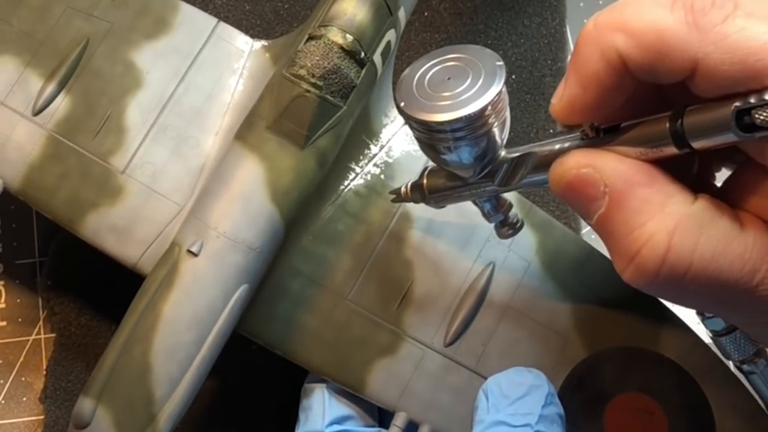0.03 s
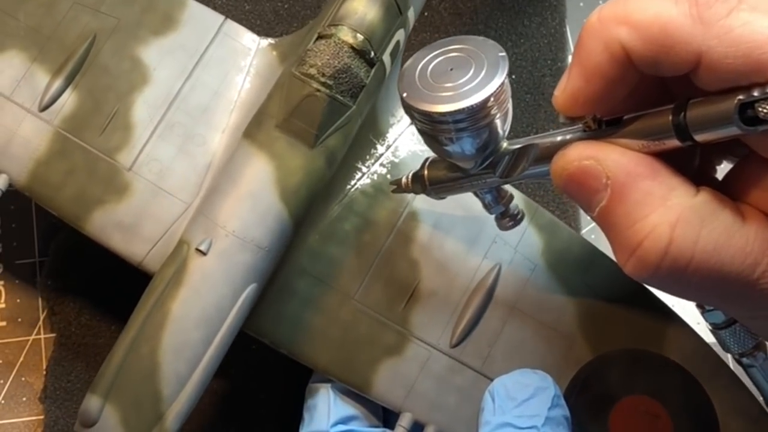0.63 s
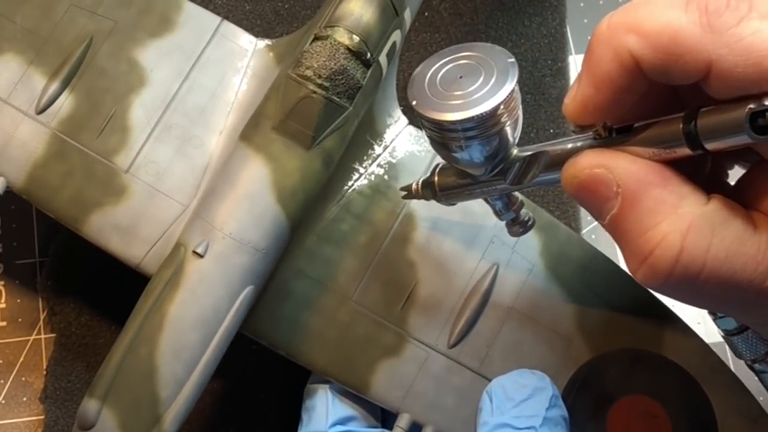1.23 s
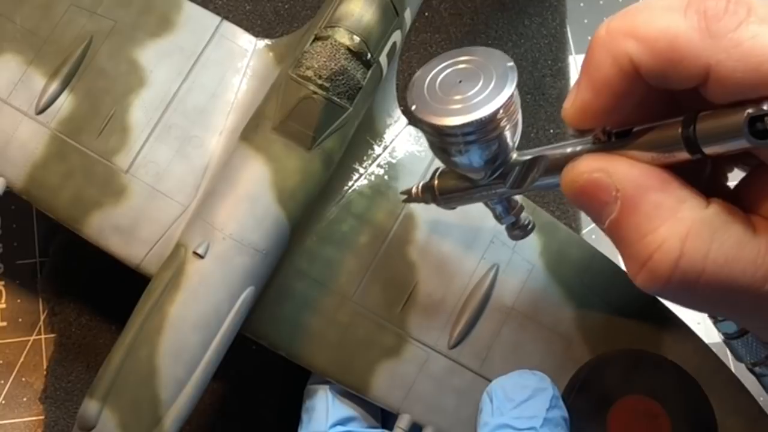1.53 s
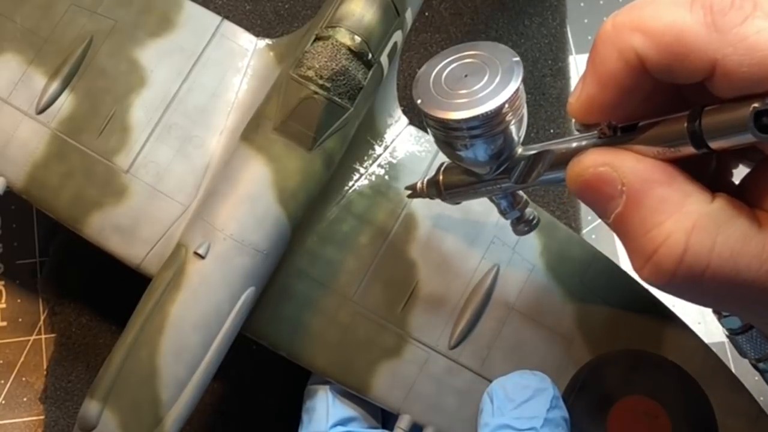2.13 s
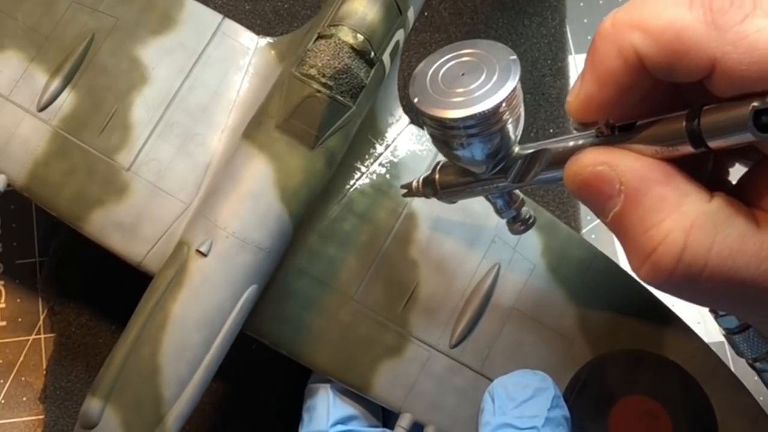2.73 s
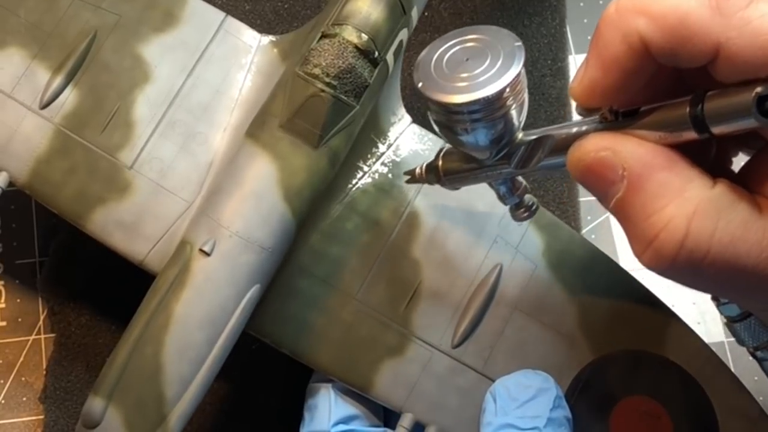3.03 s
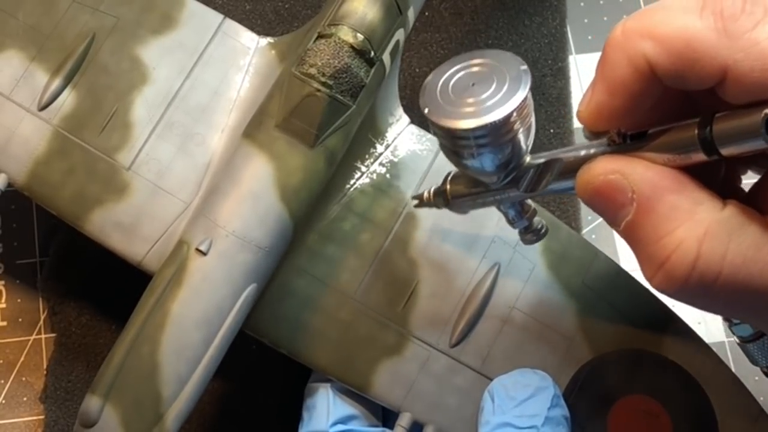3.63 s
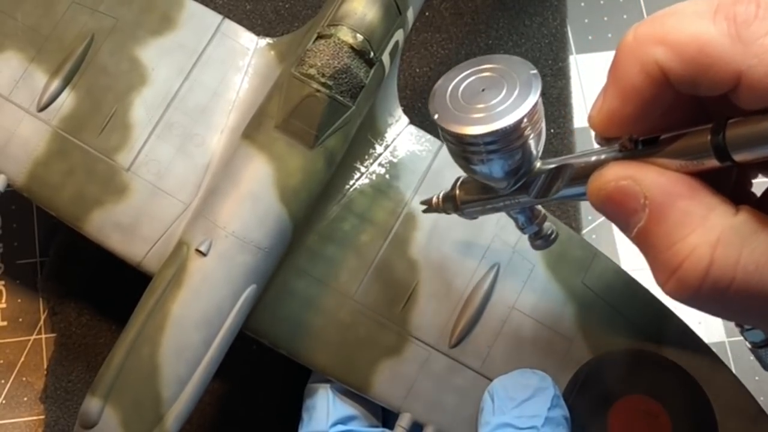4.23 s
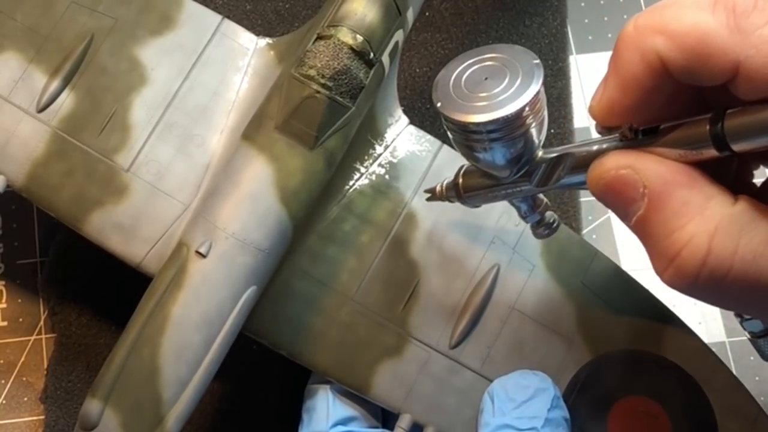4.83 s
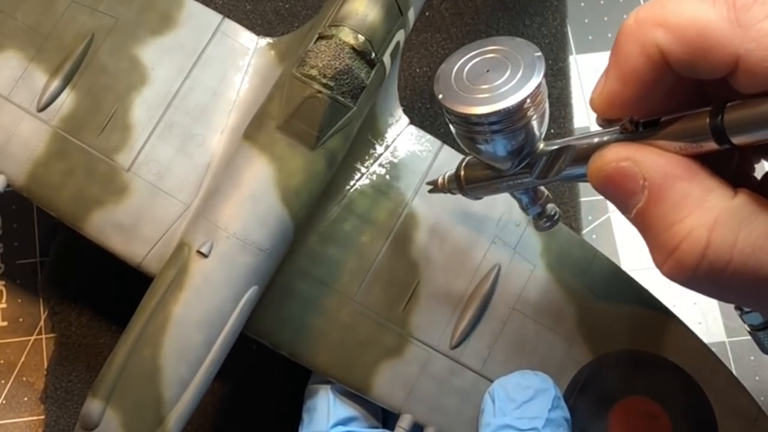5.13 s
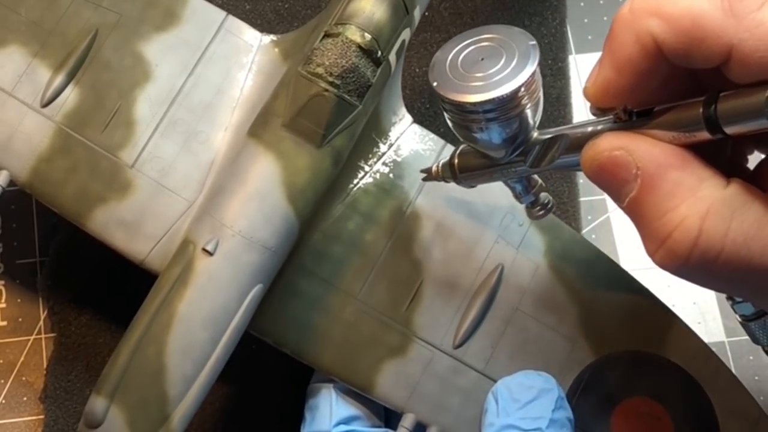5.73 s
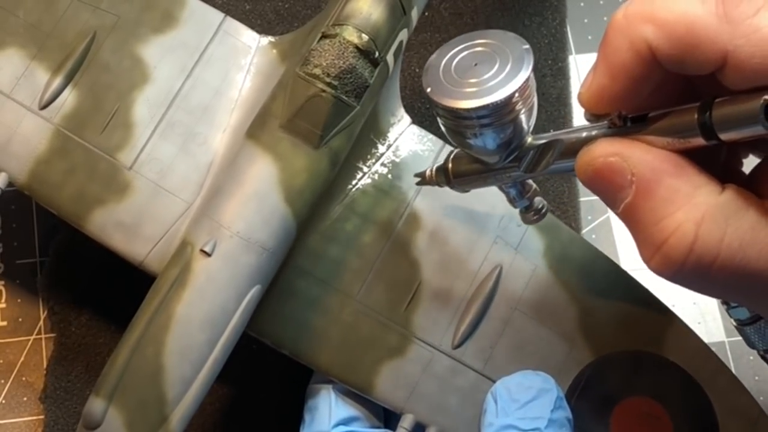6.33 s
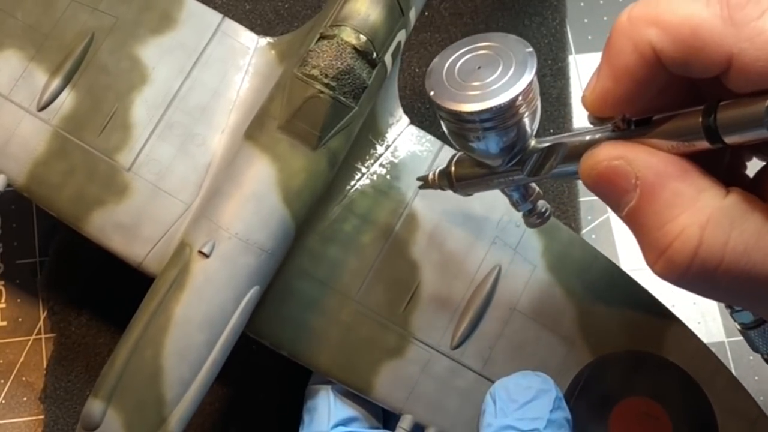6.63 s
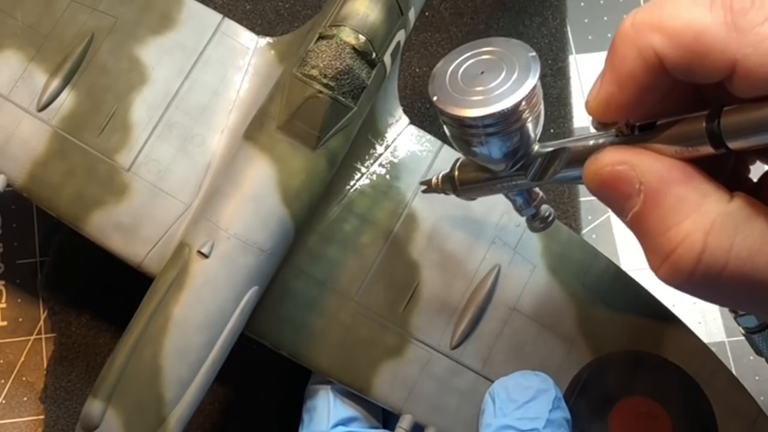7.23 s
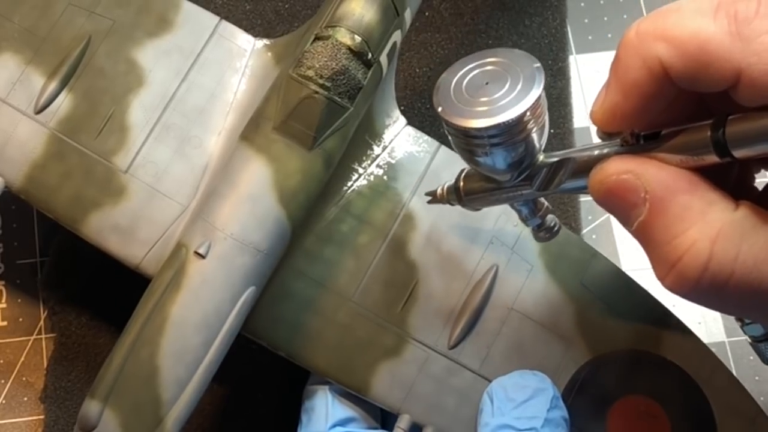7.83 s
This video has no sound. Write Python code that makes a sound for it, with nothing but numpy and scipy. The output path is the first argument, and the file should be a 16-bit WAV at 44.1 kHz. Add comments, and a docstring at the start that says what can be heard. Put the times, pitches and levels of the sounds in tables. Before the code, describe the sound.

An airbrush sprays with a bright, steady hiss while a small compressor whines and rattles behind it.

```python
"""A bright, steady hiss, close and in mono: an airbrush blowing over the wing of a plastic model.
Its turbulent air shifts in colour as the nozzle moves and now and then brushes a hollow at the wing root.
Behind it runs a small piston compressor: the induction motor whines and throbs, the valves rattle
the housing on every turn, and a soft rumble comes through the bench."""
import sys
import numpy as np
from scipy import signal
from scipy.fft import rfft, irfft
from scipy.io import wavfile
from scipy.ndimage import uniform_filter1d

SR = 44100
rng = np.random.default_rng(int(sys.argv[2]) if len(sys.argv) > 2 else 0)


def inscribe(sig):
    """Save sig as 16-bit PCM at rate SR to the path in sys.argv[1].

    A 1-D sig is mono; a 2-D sig holds one channel per row.
    Samples are clipped to [-1, 1] before scaling.
    """
    pcm = np.round(np.clip(np.atleast_2d(sig).T, -1, 1) * 32767)
    wavfile.write(sys.argv[1], SR, pcm.astype(np.int16))


N = 356195


def gain_of(db):
    """Decibels to amplitude."""
    return 10 ** (np.asarray(db) / 20)


def unit_rms(x):
    """Scales to rms 1."""
    return x / np.sqrt(np.mean(x ** 2) + 1e-20)


def curve_at(points, hz):
    """Joins spectrum points by straight lines on a log-frequency axis."""
    point_hz, value = np.transpose(points)
    return np.interp(np.log(hz + 1), np.log(point_hz + 1), value)


def noise(colour):
    """Noise of rms 1 whose amplitude spectrum is colour(Hz)."""
    white = rfft(rng.standard_normal(N))
    return unit_rms(irfft(white * colour(np.fft.rfftfreq(N, 1 / SR)), N))


def drift(rate_hz):
    """A random wander of rms 1, mostly slower than rate_hz."""
    return noise(lambda hz: 1 / (1 + (hz / rate_hz) ** 2))


def patches(shape, size):
    """A random field of rms 1, smoothed over size = (bins, frames)."""
    field = rng.standard_normal(shape)
    for axis in (0, 1, 0, 1):
        field = uniform_filter1d(field, size[axis], axis, mode="wrap")
    return unit_rms(field)


# The boom of bench and room. Each row: centre in Hz, width in Hz, relative level in dB.
BENCH_MODES = [(43.7, 7, 0), (53, 6.8, 3.5), (94, 12, -5), (120.3, 17, -3.5), (148.4, 14, -4.5),
               (175, 23, -10.5), (203, 16, -3.5)]
# Steady low drones beside the motor. Each row: pitch in Hz, level in dB.
DRONE_TONES = [(53, -61.5), (137.3, -66.5)]
# The airy bed of room and motor. Each row: frequency in Hz, relative level in dB.
ROOM_COLOUR = [(20, -22), (40, -4), (70, 0), (230, 0), (300, -4), (380, -1), (550, -5), (750, 0),
               (1000, -4), (1500, -2), (1900, -5), (2400, -13), (5000, -30)]


def rumble(bench_db=-57.5, room_db=-56.5):
    """The compressor shakes low resonances of bench and room, under two drones and a bed of air."""
    t = np.arange(N) / SR
    bench = noise(lambda hz: sum(gain_of(db) / (1 + (2 * (hz - centre) / width) ** 2)
                                 for centre, width, db in BENCH_MODES))
    drones = sum(gain_of(db) * np.sqrt(2) * np.sin(2 * np.pi * hz * t) for hz, db in DRONE_TONES)
    room = noise(lambda hz: gain_of(curve_at(ROOM_COLOUR, hz)))
    return gain_of(bench_db) * bench + drones + gain_of(room_db) * room


SHAFT_HZ, MAINS_HZ = 29.1466, 60.0083
# Resonances of the motor housing. Each row: centre in Hz, width in Hz.
HOUSING_MODES = [(756, 82), (789, 21)]
# The whine, each tone at a sum of the two rates. Each row: shaft multiple, mains multiple, level in dB.
MOTOR_TONES = [(2, 0, -71), (3, 0, -61.0), (4, 0, -66), (0, 2, -67), (5, 0, -67.5), (6, 0, -66),
               (8, 0, -81), (10, 0, -66), (11, 0, -73), (12, 0, -62), (14, 0, -72.5), (15, 0, -74.5),
               (16, 0, -80.5), (17, 0, -72), (18, 0, -88), (19, 0, -76), (20, 0, -69), (1, 10, -62.5),
               (22, 0, -74), (2, 10, -58), (-2, 12, -69.5), (23, 0, -74), (-1, 12, -62.5), (24, 0, -77),
               (0, 12, -37.5), (29, -2, -54), (25, 0, -51), (1, 12, -61), (30, -2, -64), (26, 0, -47.5),
               (2, 12, -53), (-2, 14, -85), (27, 0, -50.5), (3, 12, -85), (-1, 14, -69.5), (28, 0, -57),
               (0, 14, -77), (29, 0, -61), (1, 14, -54), (30, 0, -58), (32, 0, -67.5), (36, 4, -63.5),
               (37, 4, -71.5)]


def motor(turns, waver=0.014):
    """Magnetic and shaft tones; the rotor slips behind the mains, so close pairs beat in a steady throb."""
    shaft_cycles = turns - .247
    mains_cycles = MAINS_HZ * np.arange(N) / SR - .311
    whine = np.zeros(N)
    for shaft_order, mains_order, db in MOTOR_TONES:
        hz = shaft_order * SHAFT_HZ + mains_order * MAINS_HZ
        cycles = shaft_order * shaft_cycles + mains_order * mains_cycles
        # tones above a housing resonance lag those below it
        lag = sum(2 * np.arctan(2 * (hz - centre) / width) for centre, width in HOUSING_MODES)
        whine += gain_of(db) * np.sqrt(2) * np.cos(2 * np.pi * cycles - lag)
    return whine * (1 + waver * drift(rate_hz=4.9))


# The rattle of piston and valves.
# Each row: moment as a share of the turn, pitch in Hz, seconds to die by 60 dB, level in dB.
VALVE_KNOCKS = [(0.403, 1112, 0.087, -52.0), (0.434, 1436, 0.057, -42.9), (0.452, 1483, 0.1, -50.0),
                (0.6, 1255, 0.1, -60.5), (0.619, 1530, 0.02, -42.8), (0.62, 1750, 0.014, -43.6),
                (0.626, 1108, 0.018, -42.1), (0.63, 1423, 0.086, -50.5), (0.634, 2010, 0.098, -66.3),
                (0.784, 1978, 0.1, -53.8), (0.843, 1025, 0.057, -51.3)]


def valves(turns, uneven_db=1.14):
    """Each turn strikes the pump's modes in the same order, never quite equally hard."""
    t = np.arange(SR // 8) / SR
    strength = gain_of(uneven_db * drift(SHAFT_HZ))
    rattle = np.zeros(N)
    for moment, hz, t60, db in VALVE_KNOCKS:
        samples_from_strike = ((turns - moment + .5) % 1 - .5) * SR / SHAFT_HZ
        strikes = np.maximum(1 - abs(samples_from_strike), 0) * strength
        ring = np.exp(-np.log(1000) * t / t60) * np.sin(2 * np.pi * hz * t)
        rattle += gain_of(db) * signal.oaconvolve(strikes, ring)[:N]
    return rattle


# Breathy passes over the hollow at the wing root.
# Each row: middle in seconds, length in seconds, top pitch in Hz, top level in dB.
HOLLOW_PASSES = [(2.63, .6, 2350, -61.5), (4.35, .7, 2710, -64), (7.6, 0.42, 2220, -66)]


def hollow(width_hz=220, pitch_sag=.1):
    """The jet wakes a broad, soft resonance: on each pass its level and pitch rise and fall in one arch."""
    t = np.arange(N) / SR
    air = drift(width_hz) + 1j * drift(width_hz)
    breath = np.zeros(N)
    for middle, length, hz, db in HOLLOW_PASSES:
        arch = np.cos(np.pi * np.clip((t - middle) / length, -.5, .5))
        pitch_hz = hz * (1 - pitch_sag * (1 - arch))
        phase = 2 * np.pi * np.cumsum(pitch_hz) / SR
        breath += gain_of(db) * arch ** 2 * (air * np.exp(1j * phase)).real
    return breath


# The tone colour of the hiss. Each row: frequency in Hz, relative level in dB.
JET_COLOUR = [(600, -11), (2200, -14.5), (2900, -14.5), (3600, -12), (4300, -13), (4700, -7.5),
              (5200, -12.5), (6000, -11.5), (7900, -4), (9900, -6), (11000, -6), (12000, -8.5), (14500, 3),
              (16000, -2)]
# Level rides for the top, middle and low treble: sizzle at the nozzle, rush on the wing, wash off it.
# Each row: time in seconds, boost or cut in dB.
SIZZLE_RIDE = [(0.0, -0.5), (0.85, 0.5), (1.7, -0.3), (3.15, 1.4), (3.95, -1.1), (5.3, -0.2), (5.9, 1),
               (7.4, 0.5), (8.0, -0.5)]
RUSH_RIDE = [(0.0, 1), (0.7, 1.1), (2.55, -0.3), (2.95, 0.5), (4.25, -1.1), (5.9, 1.5), (6.15, -0.6),
             (8.0, -1.2)]
WASH_RIDE = [(0.0, -0.8), (2.2, 0.7), (3.95, 1.0), (5.6, -2), (6.6, 0.2), (8.0, 0.4)]
# The centres of sizzle, rush and wash in Hz, in that order.
BAND_CENTRES = [13500, 7350, 3200]


def jet(level_db=-38.5, shift_db=.5, ripple_db=1.5, lift_s=8.02, lift_db_per_s=75):
    """Turbulent air changes colour as the nozzle moves, and dips at the very end as the hand lifts away."""
    framing = dict(fs=SR, nperseg=1024, noverlap=768)
    hz, t, white = signal.stft(rng.standard_normal(N), **framing)
    lift_db = lift_db_per_s * np.maximum(t - lift_s, 0)
    eq_db = curve_at(JET_COLOUR, hz)[:, None] - lift_db
    for centre, ride in zip(BAND_CENTRES, (SIZZLE_RIDE, RUSH_RIDE, WASH_RIDE)):
        # each band crossfades into its neighbours
        band = curve_at([(f, f == centre) for f in sorted(BAND_CENTRES)], hz)
        ride_db = np.interp(t, *np.transpose(ride))
        eq_db += np.outer(band, ride_db)
    eq_db += shift_db * patches(white.shape, size=(9, 90))  # near reflections wander with the hand
    eq_db += ripple_db * patches(white.shape, size=(2, 70))  # farther ones comb the hiss more finely
    _, hiss = signal.istft(white * gain_of(eq_db), **framing)
    return gain_of(level_db) * unit_rms(hiss[:N])


def scene():
    """The airbrush in front of its compressor, alike in both channels."""
    turns = SHAFT_HZ * np.arange(N) / SR
    mix = jet() + motor(turns) + valves(turns) + rumble() + hollow()
    return np.tile(mix, (2, 1))


def record(dry, low_cut_hz=22, high_cut_hz=15800):
    """A gentle low cut trims the sub-bass and a steep high cut tops off the hiss."""
    low_cut = signal.butter(2, low_cut_hz, "highpass", fs=SR, output="sos")
    high_cut = signal.firwin(1023, high_cut_hz, window=("kaiser", 9), fs=SR)
    return signal.oaconvolve(signal.sosfilt(low_cut, dry), high_cut[None], "same")


dry = scene()
out = record(dry)
inscribe(out)
```